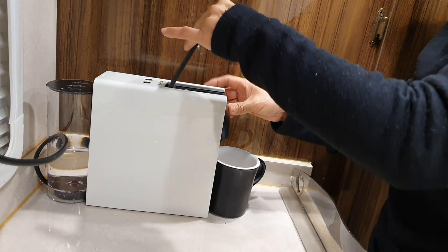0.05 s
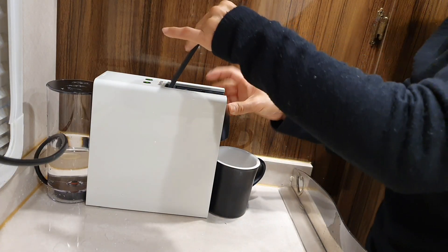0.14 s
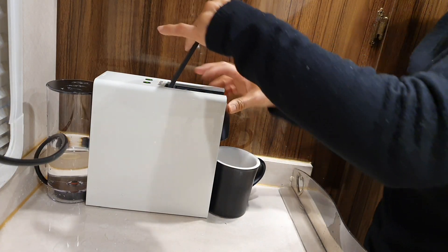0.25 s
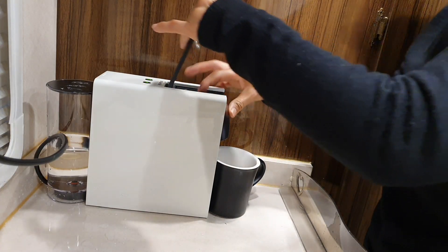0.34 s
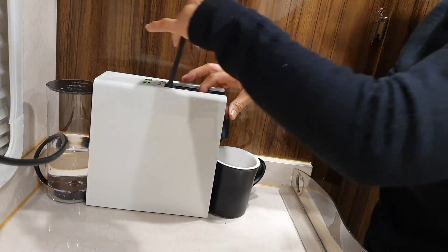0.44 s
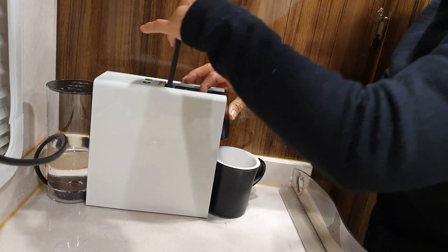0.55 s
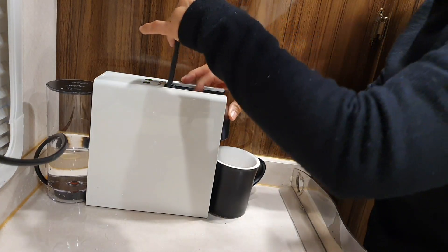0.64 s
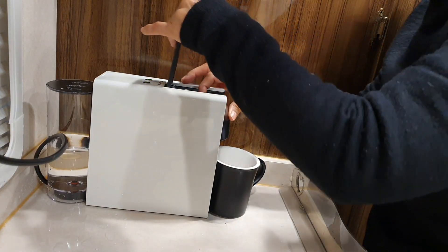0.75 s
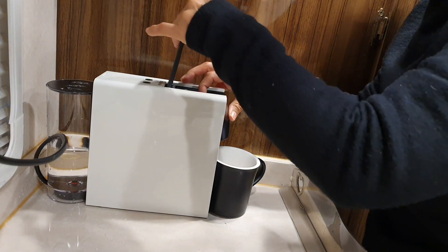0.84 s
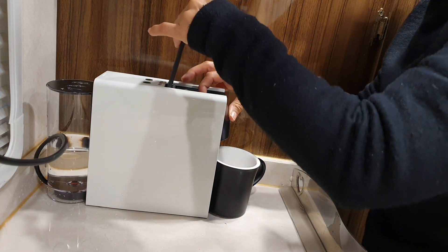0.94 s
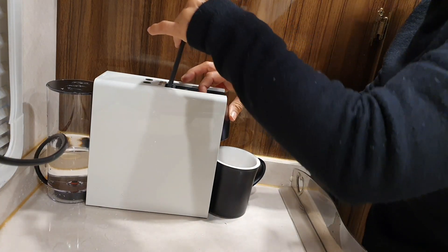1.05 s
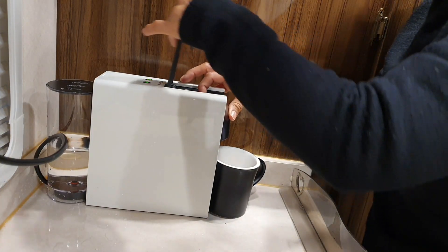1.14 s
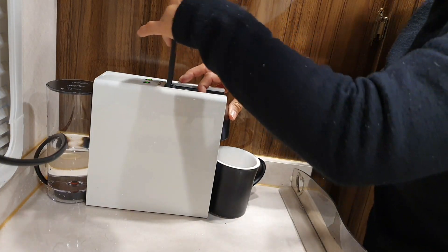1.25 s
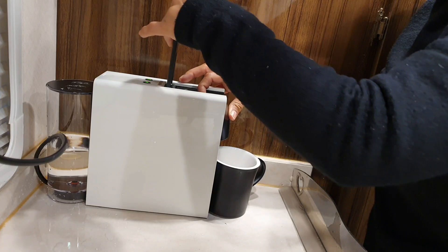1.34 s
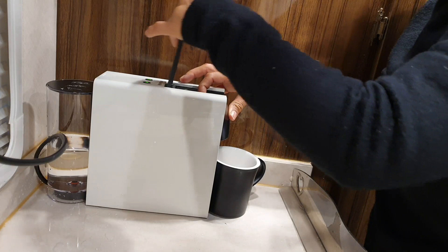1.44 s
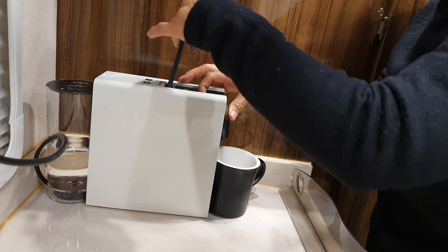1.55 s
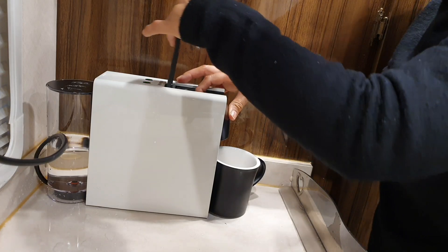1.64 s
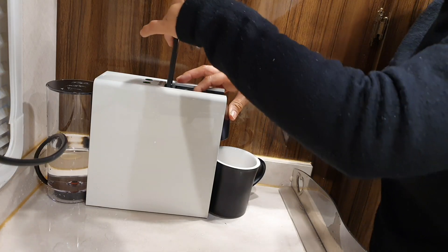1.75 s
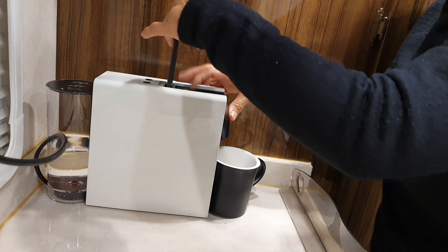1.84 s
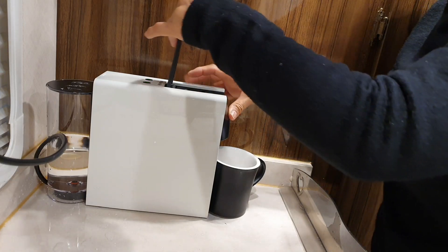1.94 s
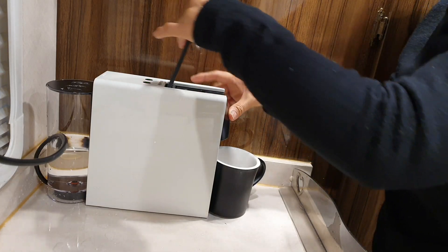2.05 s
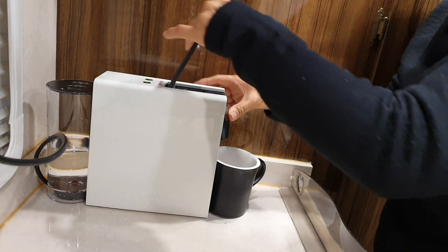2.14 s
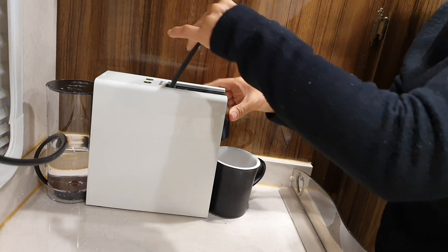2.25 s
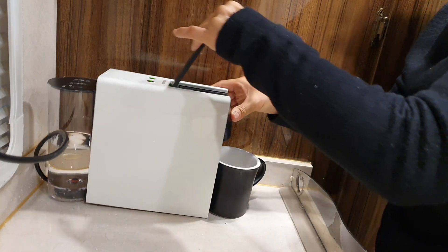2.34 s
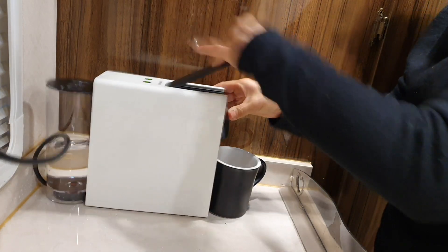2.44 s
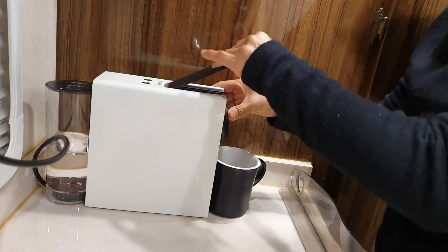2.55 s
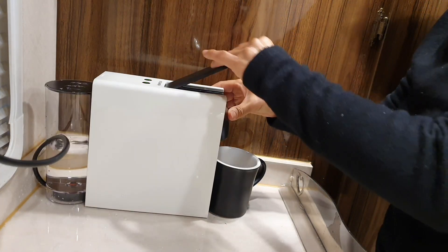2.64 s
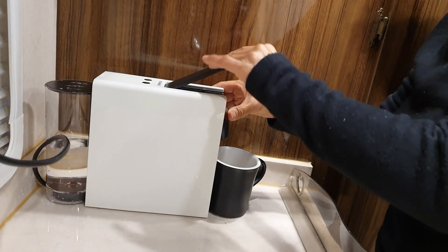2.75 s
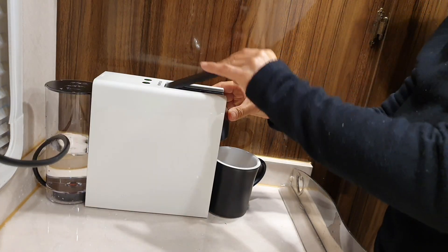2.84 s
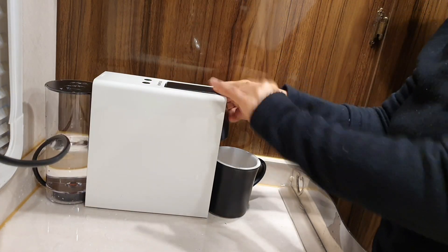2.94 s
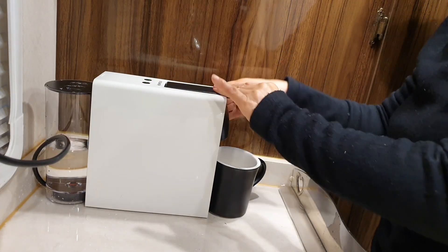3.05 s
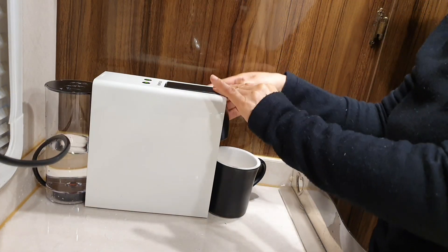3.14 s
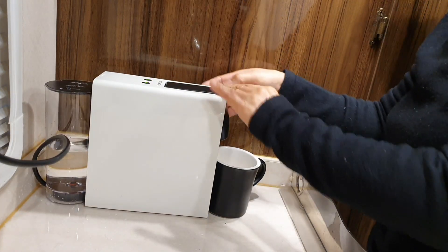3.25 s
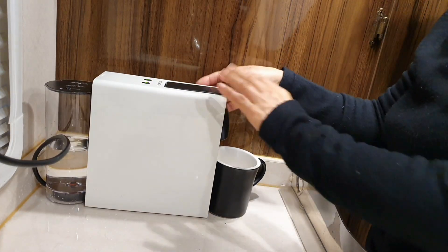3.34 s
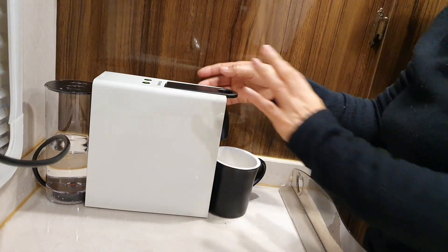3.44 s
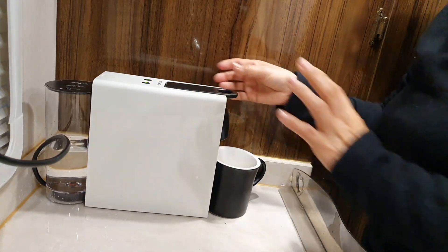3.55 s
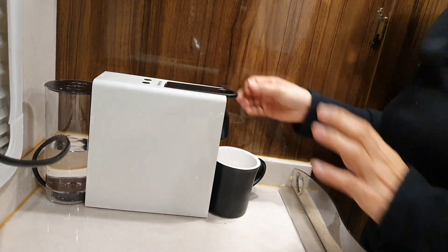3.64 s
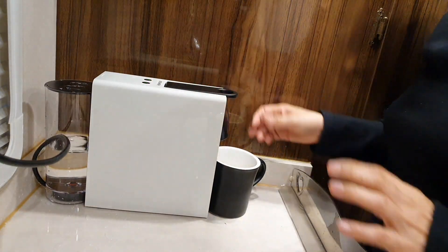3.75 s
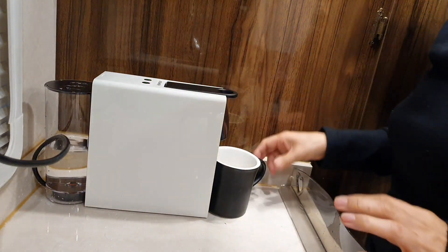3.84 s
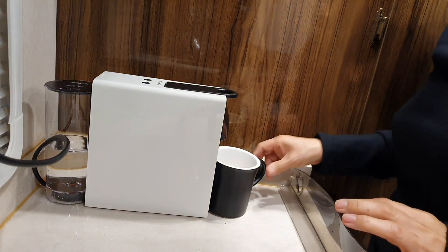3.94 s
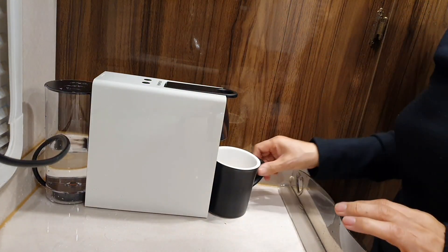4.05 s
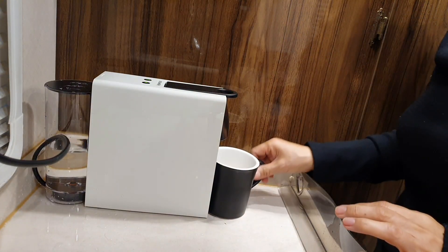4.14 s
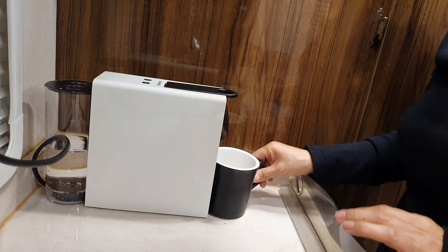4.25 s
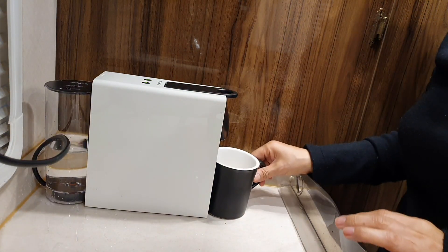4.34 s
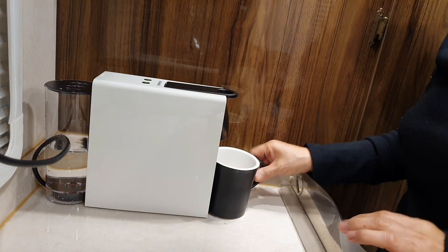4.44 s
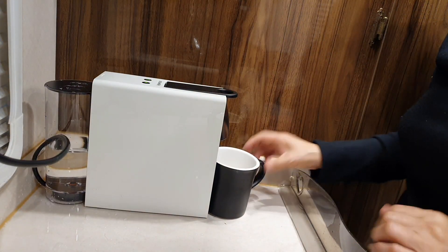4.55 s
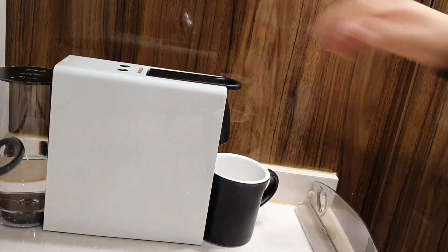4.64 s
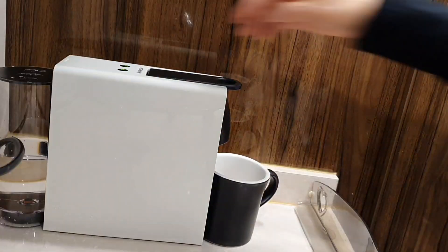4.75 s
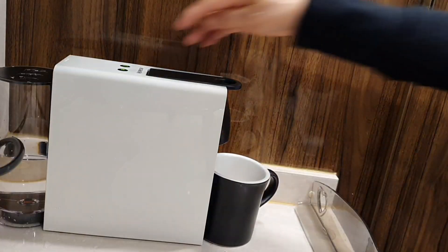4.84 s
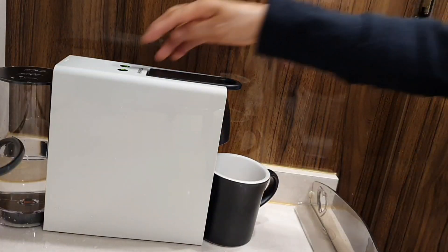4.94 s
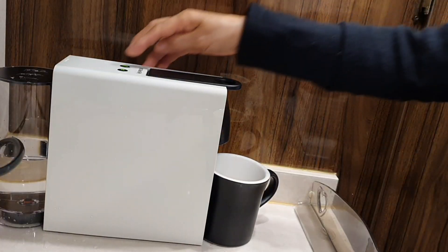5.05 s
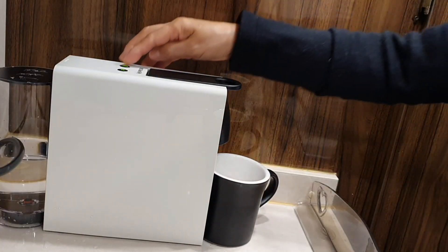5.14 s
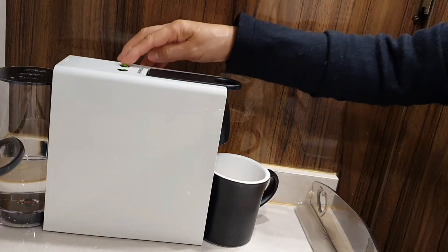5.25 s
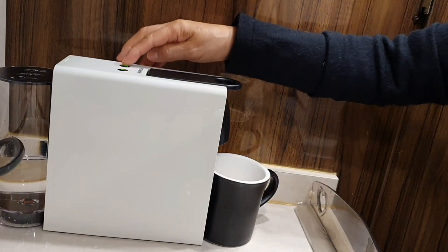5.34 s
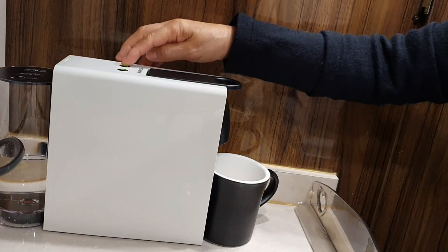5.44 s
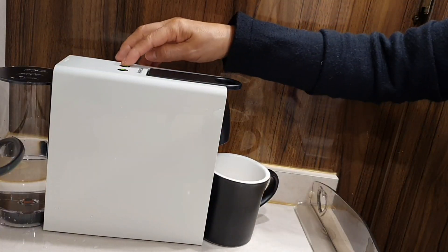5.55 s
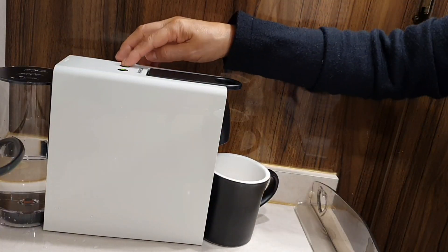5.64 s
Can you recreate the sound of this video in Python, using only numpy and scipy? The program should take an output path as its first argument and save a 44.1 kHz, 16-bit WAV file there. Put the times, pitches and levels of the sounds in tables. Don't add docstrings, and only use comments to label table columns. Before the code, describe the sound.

A small, hard-walled kitchen heard closely in stereo, with a low compressor hum around 120 Hz, airy casing noise and a thin wavering whine. From about 0.4 to 2.3 seconds a plastic lever is rocked: dull hollow knocks, light bright capsule ticks, a faint dry squeak near 0.6, and slight cloth rustle. A small crisp snap comes at 2.4. At 2.55 to 2.75 the lever goes down with a loud, dense, crackling crunch, bassy with sharp metallic-plastic edges. It slams shut at 3.07, a hard thud with a quick rebound and short ring. The hum and rumble duck afterwards, then recover. Around 4.27 a mug makes a quick double clink and bounces, followed by a dull knock at 4.34. At 4.7 the hum cuts off with a tiny tick. Until about 5.7 there is only quiet hiss, a soft low thump near 4.8, faint touches and a brief grainy finger brush at 5.3.

```python
import sys
import numpy as np
from scipy import signal
from scipy.io import wavfile

SR = 44100
rng = np.random.default_rng(int(sys.argv[2]) if len(sys.argv) > 2 else 0)


def wav_out(sig):
    wavfile.write(sys.argv[1], SR, np.round(np.clip(np.atleast_2d(sig).T, -1, 1) * 32767).astype(np.int16))


def nominal_scale(level):
    x = np.asarray(level, float) / 20
    return 10 ** x


N = 250469
T = np.arange(N) / SR
CUT_S = 4.692
EDGES_HZ = 25 * 2 ** np.arange(0, 9.7, .4)
CENTRES_HZ = np.sqrt(EDGES_HZ[1:] * EDGES_HZ[:-1])
LEVER_LAG, COUNTER_LAG = -5, 10

# freq_hz, level_db, t60_s
HOUSING_MODES = [(95, -10.5, 0.17), (142, -9.5, 0.23), (229, -8, 0.26), (275, -1, 0.16), (376, -13, 0.034),
                 (499, -5, 0.12), (545, -6, 0.34), (607.7, -9.5, 0.26), (876, -11.5, 0.084),
                 (1089, -11.5, 0.103), (1366, -16, 0.16), (1410, -19, 0.11), (2400, -9.5, 0.032),
                 (4700, -18, 0.023)]
# freq_hz, level_db, t60_s
COUNTER_MODES = [(152, -2, 0.065), (275, 8, 0.068), (347, -25, 0.21), (517, -1.5, 0.14), (607, 3, 0.078),
                 (810, -12, 0.064), (1350, -25, 0.049)]
# start_s, gain_db
AUTO_GAIN = [(0, 0.5), (1.3, 0.5), (2.2, 1.6), (2.6, 0), (2.8, -2.5), (3.3, -5.5), (3.9, -7.5),
             (4.25, -7.5), (4.45, -3.5), (4.68, -2)]


def rms_one(x):
    return x / np.sqrt(np.mean(x ** 2) + 1e-20)


def in_time(rows):
    s, *columns = np.transpose(rows)
    return [np.interp(T, s, c) for c in columns]


def at_hz(points, hz):
    points_hz, values = np.array(points).T
    return np.interp(np.log(hz), np.log(points_hz), values)


def sides(hz):
    # freq_hz, left_minus_right_db
    left_louder = [(60, 1.5), (180, 5), (550, 1.5), (1650, 5), (4970, 3), (9000, 5.5), (15000, 5.5)]
    return nominal_scale(at_hz(left_louder, hz) * np.array([[.5], [-.5]]))


def placed(x, left_db, lag):
    return np.array([np.roll(x[0], lag), x[1]]) * nominal_scale(left_db * np.array([[.5], [-.5]]))


def drift(rate_hz):
    r = np.exp(-80 * np.pi * rate_hz / SR)
    slow = signal.lfilter([1], [1, -2 * r, r * r], rng.standard_normal(N // 40 + 2002))[2000:]
    return np.interp(np.arange(N) / 40, np.arange(len(slow)), rms_one(slow))


def ring(x, hz, t60_s):
    r, w = nominal_scale(-60 / (t60_s * SR)), 2 * np.pi * hz / SR
    return signal.lfilter([0, np.sin(w)], [1, -2 * r * np.cos(w), r * r], x + 1e-18)


def stroke_db(s, hold_s, db, release, attack):
    return db - attack * np.clip(s - T, 0, None) - release * np.clip(T - s - hold_s, 0, None)


def stereo_bands():
    # freq_hz, left_right_likeness
    likeness = [(60, .97), (180, .9), (550, .55), (1650, .2), (5000, -.05), (15000, -.1)]
    white, bands = rng.standard_normal((2, 2, N)), []
    for k, hz in enumerate(CENTRES_HZ):
        sos = signal.butter(2, EDGES_HZ[k:k + 2], "band", fs=SR, output="sos")
        mid, side = signal.sosfilt(sos, white[k % 2])
        alike = np.clip(at_hz(likeness, hz), -.99, .99)
        bands.append(sides(hz) * (np.sqrt(1 + alike) * mid + np.sqrt(1 - alike) * side * [[1], [-1]]))
    return np.array(bands)


def coloured(bands, spectrum, shift_s):
    mix = np.tensordot(nominal_scale(at_hz(spectrum, CENTRES_HZ)), bands, 1)
    return np.roll(rms_one(mix), round(shift_s * SR), axis=1)


def contacts(blows, length_s, upper_db, stiffens=0, follows=0):
    return [(s, db, thud, crack, length_s * nominal_scale(-stiffens * (db + 20)), upper_db + follows * (crack + 25))
            for s, db, thud, crack in blows]


def blow_colour_db(blows, hz):
    s, peak_db, thud_db, crack_db = np.transpose(blows)[:4]
    low = np.clip(np.log(400 / hz) / 1.0, 0, 1)
    high = np.clip(np.log(hz / 1700) / 2.2, 0, 1)
    return peak_db + low * (thud_db - 1.0) + high * (crack_db + 18.5)


def struck(blows, modes, bands, ring_db, scatter_db, tail):
    # freq_hz, level_db_per_hz
    scatter = [(40, -43.5), (90, -7.5), (300, -9.5), (600, -14), (1300, -23), (2800, -27.5), (5000, -32),
               (7600, -45.5), (10000, -31), (15000, -34), (16800, -58.5)]
    # freq_hz, t60_s
    walls = [(60, 0.32), (150, 0.2), (500, 0.12), (1500, 0.14), (5000, 0.16), (14000, 0.1)]
    s, length_s, upper_db = np.array(blows)[:, [0, 4, 5]].T
    chatter = np.sort(rng.random((len(blows), 4)), axis=1)
    chatter = (chatter - chatter[:, :1]) * np.clip(length_s, .001, .03)[:, None]
    first, last = round((s[0] - .01) * SR), min(N, round((s[-1] + .45) * SR))
    at = np.round((s[:, None] + chatter) * SR).astype(int) - first
    out = np.zeros((2, last - first))

    for k, (hz, mode_db, t60_s) in enumerate(modes):
        clicks = np.zeros_like(out)
        level_db = blow_colour_db(blows, min(hz, 1700)) + mode_db + ring_db + upper_db * (hz > 1900)
        strength = nominal_scale(level_db[:, None] + rng.normal(0, 2.5, at.shape)) * [1, .5, .35, .2]
        strength = (-1) ** k * strength
        lag = round(min(hz / 900, 1) * rng.uniform(-.3, .3) * SR / hz)
        np.add.at(clicks[0], at, strength)
        np.add.at(clicks[1], at + lag, strength)
        out += ring(clicks, hz, t60_s) * sides(hz)

    for band, hz in zip(bands, CENTRES_HZ):
        power = np.zeros(last - first)
        level_db = blow_colour_db(blows, hz) + at_hz(scatter, hz) + scatter_db
        np.add.at(power, at, nominal_scale(2 * level_db)[:, None] * np.ones(at.shape))
        fall = nominal_scale(-120 / (tail * at_hz(walls, hz) * SR))
        rise = np.exp(-hz / (1.5 * SR) - 1 / (0.0034 * SR))
        crack = signal.lfilter([2.2 * min(hz / 4000, 1)], [1, -nominal_scale(-120 / (0.011 * SR))], power + 1e-24)
        echo = signal.lfilter([1 - rise], np.convolve([1, -fall], [1, -rise]), power + 1e-24)
        out += band[:, first:last] * np.sqrt(crack + echo)
    return np.pad(out, ((0, 0), (first, N - last)))


def lever_crunch(bands):
    # start_s, peak_db, thud_db, crack_db
    crunches = [(2.535, -35, -2, -43), (2.549, -29.5, -3, -28), (2.560, -24, -9.5, -21),
                (2.566, -13, -3.5, -28), (2.572, -14, -6, -27), (2.577, -11, -5.5, -19.5),
                (2.5955, -10, -8, -13), (2.602, -8, -2.5, -11.5), (2.609, -16.5, -7, -12.5),
                (2.620, -12.5, -6, -23), (2.627, -14.5, -7, -19.5), (2.635, -18.5, 0.5, -22),
                (2.652, -17.5, -12.5, -25), (2.677, -21, -7, 1), (2.681, -19, -18, -13.5),
                (2.698, -25.5, -1.5, -3.5), (2.719, -27.5, -1.5, -12), (2.739, -41, -4, -37),
                (2.798, -48.5, -8, -18.5)]
    # freq_hz, level_db, t60_s
    linkage = [(62, -5.5, 0.16), (121.1, 1.5, 0.14), (158.5, -9, 0.12), (275, -5.5, 0.065),
               (349, -3.5, 0.071), (572, -4, 0.12), (764, -29.5, .02), (1070, -13, 0.051),
               (1290, -8, 0.067), (2106, -7, 0.021), (4160, -23, 0.027)]
    blows = contacts(crunches, 0.0041, -4.5, stiffens=.3, follows=0.43)
    return placed(struck(blows, linkage, bands, ring_db=-9.5, scatter_db=9.0, tail=0.88), .1, LEVER_LAG)


def lever_slam(bands):
    # start_s, peak_db, thud_db, crack_db
    slams = [
        (3.0705, -24.5, -14.5, -32),
        (3.0722, -7, -14, -21),
        (3.083, -9.5, -6.5, -31.5),
        (3.338, -48, 9, -55),
        (3.38, -55.5, 12, -35),
    ]
    # freq_hz, level_db, t60_s
    shell = [(91.7, -22.5, 0.51), (129.8, -13.5, 0.1), (148.7, -6, 0.18), (356, -13.5, 0.05),
             (443.4, -13, 0.13), (552, -14, 0.18), (624.6, -14.5, 0.11), (797, -17, 0.057),
             (1066, -22, 0.056), (1217, -25.5, 0.13), (1305, -22, 0.1354), (1616, -24, 0.15),
             (2385, -32.5, 0.12), (4918, -19.5, 0.034)]
    blows = contacts(slams, 0.0034, 2.0, stiffens=0.55, follows=0.9)
    return placed(struck(blows, shell, bands, ring_db=-8.0, scatter_db=7.0, tail=1.0), 0.2, 0)


def lever_rocking(bands):
    # start_s, peak_db, thud_db, crack_db
    rocks = [(0.421, -35.5, -4, -56), (0.447, -39, -11, -25), (0.461, -27.5, -10, -50),
             (0.489, -46, 3, -26), (0.554, -45, 6, -26), (0.902, -38, 2, -53), (0.930, -29.5, -36, -51),
             (1.283, -23, -10.5, -48), (1.58, -38.5, 16.5, -50), (1.598, -25, -34, -33.5),
             (1.616, -37, 15.5, -39), (1.741, -32, -11, -44), (2.113, -31.5, 0.5, -54),
             (2.156, -33.5, 6, -45), (2.185, -31.5, -4, -47), (2.209, -27, -8, -47)]
    # start_s, peak_db, thud_db, crack_db
    ticks = [(0.529, -45, 12.5, -30), (0.592, -46.5, -11, -30), (0.614, -53, -17, -21),
             (0.694, -44, -4, -29), (0.716, -50, -16, -18), (0.939, -38.5, 14.5, -31),
             (0.963, -47, -19, -28), (1.184, -45, 7, -50), (1.31, -35.5, 8.5, -26), (1.34, -42, 4.5, -33),
             (1.606, -31.5, 4, -30), (1.709, -44, -28, -33), (1.732, -43.5, 14.5, -32),
             (1.791, -33.5, 0.5, -33), (1.82, -52, 3, -21), (2.239, -44, -62, -21),
             (2.26, -40.5, 1.5, -27.5), (2.491, -50, -10, -25)]
    blows = sorted(contacts(rocks, .012, -16) + contacts(ticks, 0.013, 9.9, follows=0.56))
    return placed(struck(blows, HOUSING_MODES, bands, ring_db=-9.0, scatter_db=8.0, tail=0.94), 0.1, LEVER_LAG)


def capsule_snap(bands):
    # start_s, peak_db, thud_db, crack_db
    snaps = [
        (2.3855, -31, -23.5, -22),
    ]
    # freq_hz, level_db, t60_s
    seat = [(513, -7, 0.16), (889, -9.5, 0.1), (1143, 4, 0.042), (1604, 4, 0.051), (2810, -15, 0.035),
            (3240, -8, 0.051)]
    blows = contacts(snaps, 0.0016, 1.5)
    return placed(struck(blows, seat, bands, ring_db=-7, scatter_db=11.5, tail=0.83), 0.1, LEVER_LAG)


def mug_nudge(bands):
    # start_s, peak_db, thud_db, crack_db
    clinks = [
        (4.265, -22, -7, -23),
        (4.2685, -26.5, -12, -23.5),
        (4.278, -21, -1, -28),
        (4.2845, -22, -24, -22),
        (4.291, -25, -7, -46),
    ]
    # freq_hz, level_db, t60_s
    tray = [(564, -11, 0.15), (793, -5, 0.072), (1267, -1, 0.066), (1522, -3, 0.041), (2360, -10, 0.061),
            (2740, -1.5, 0.015), (3860, -20, 0.05), (4240, -15.5, 0.033), (5320, -14.5, 0.023),
            (9440, -33, .03)]
    # start_s, peak_db, thud_db, crack_db
    knocks = [
        (4.343, -38, 5.5, -66),
        (4.424, -51.5, 14, -40),
        (4.454, -58, 15, -38),
        (4.548, -54, -9, -50.5),
    ]
    mug = struck(contacts(clinks, 0.00379, 1.5), tray, bands, ring_db=-9.5, scatter_db=8.5, tail=0.8)
    knock = struck(contacts(knocks, 0.0069, -10), COUNTER_MODES, bands, ring_db=-2, scatter_db=7.5, tail=0.92)
    return placed(mug + knock, 0.11, 0)


def hand_touches(bands):
    # start_s, peak_db
    touches = [(4.8, -62), (4.873, -62), (4.904, -60.5), (5.086, -58.5), (5.148, -66), (5.387, -52),
               (5.415, -56.5), (5.439, -64), (5.631, -69.5)]
    thud_db, crack_db = -5.5, -43
    blows = contacts([(s, db, thud_db, crack_db) for s, db in touches], 0.013, -15)
    return placed(struck(blows, COUNTER_MODES, bands, ring_db=-14.5, scatter_db=8.5, tail=1.0), 0.1, COUNTER_LAG)


def finger_brush(bands):
    # freq_hz, level_db_per_hz
    skin = [(290, -12), (500, -6.5), (1840, -7), (2040, -2), (4420, -17.5), (5500, -13.5), (7500, -18),
            (10000, -5), (13100, -5.5), (15800, -7), (16500, -27.5)]
    level_db = stroke_db(5.296, hold_s=0.0249, db=-52.5, release=391, attack=1100)
    return placed(coloured(bands, skin, shift_s=3.5) * nominal_scale(level_db + 1.9 * drift(67)), 0.1, COUNTER_LAG)


def pings():
    # start_s, peak_db, freq_hz, t60_s
    parts = [(.448, -51.5, 10440, .09), (.598, -70, 5500, .08), (.72, -70, 5400, .03),
             (.936, -50, 4750, .055), (.94, -56, 2400, .04), (1.311, -58, 5200, .04),
             (1.608, -40, 4710, .047), (1.794, -51, 2450, .03), (1.797, -46, 4720, .03),
             (2.598, -24, 4160, .05), (2.606, -26, 4990, .05), (2.6785, -19, 2812, .06),
             (2.679, -27, 3531, .06), (2.6795, -24, 4850, .05), (2.68, -23, 5879, .03),
             (2.684, -28, 6476, .05), (2.692, -29, 5000, .04), (3.071, -56, 2720, .8),
             (4.266, -32, 2760, .04), (4.267, -32, 1290, .06), (4.28, -66, 10228, .28),
             (4.281, -73, 8540, .25), (4.338, -75, 8500, .14), (4.34, -84, 12400, .1),
             (4.44, -88, 14200, .25), (4.445, -82, 8446, .28), (4.797, -80, 8700, .06),
             (4.798, -82, 6300, .08)]
    twin_ratio, twin_db = 1.012, -8
    swell = 1 - np.exp(-T[:SR // 2] / 0.0026)
    out = np.zeros((2, N))
    for s, peak_db, hz, t60_s in parts:
        at = round(s * SR)
        click = np.zeros(SR // 2)
        click[0] = nominal_scale(peak_db)
        tone = ring(click, hz, t60_s) + nominal_scale(twin_db) * ring(click, twin_ratio * hz, t60_s)
        out[:, at:at + SR // 2] += tone * swell * sides(hz) * [[1], [.6]]
    return out


def lever_drag():
    # start_s, hold_s, level_db, release_db_per_s
    housing_drags = [
        (.48, 0.14, -50, 390),
        (3.14, 0.084, -51, 87.5),
    ]
    # start_s, hold_s, level_db, release_db_per_s
    squeaks = [
        (.48, .09, -96, 300),
        (.61, .04, -73, 600),
    ]
    attack_db_per_s, end = 451.5, round(3.8 * SR)
    housing_db, squeak_db = (np.max([stroke_db(*row, attack_db_per_s) for row in rows], axis=0)[:end]
                             for rows in (housing_drags, squeaks))
    friction = rng.standard_normal((2, N)) * nominal_scale(2.0 * drift(45))
    friction[1] = 0.29 * friction[0] + 0.96 * friction[1]
    friction = friction[:, :end]
    body = sum(ring(friction, hz, .6 * t60_s) * nominal_scale(db) for hz, db, t60_s in HOUSING_MODES[2:9])
    squeak = ring(friction, 4800, 0.0025)
    out = rms_one(body) * nominal_scale(housing_db) + rms_one(squeak) * nominal_scale(squeak_db)
    return np.pad(out, ((0, 0), (0, N - end)))


def thumps():
    # start_s, peak_db, freq_hz, t60_s
    pushes = [(.905, -49, 600, .1), (.934, -32.5, 534, 0.077), (.957, -42, 545, 0.05),
              (1.596, -41, 110, .1), (2.186, -29, 545, 0.1), (2.212, -34, 545, 0.027),
              (2.261, -32, 121, .1), (2.569, -18, 561, .05), (2.5966, -9, 189, 0.027),
              (2.600, -17.5, 62, 0.22), (2.603, -28, 167, 0.023), (2.6186, -18, 135, 0.058),
              (2.642, -11, 113.6, .06), (2.655, -17, 573, 0.067), (2.6814, -12.5, 362, 0.023),
              (2.703, -25.5, 275, 0.19), (3.0727, -8, 272, 0.18), (3.0734, -22, 156, 0.13),
              (3.073, -10.5, 187.2, 0.093), (3.17, -48, 625, 0.46), (3.26, -53.5, 365.6, 0.32),
              (4.342, -28, 275, .14), (4.828, -32, 79.7, 0.079), (5.352, -43.5, 73, .11)]
    out = np.zeros((2, N))
    for s, peak_db, hz, t60_s in pushes:
        at = slice(round((s - .02) * SR), round((s + .3) * SR))
        push = np.exp(-.5 * ((T[at] - s) * hz / 0.17) ** 2)
        thump = ring(np.gradient(push), hz, t60_s)
        out[:, at] -= nominal_scale(peak_db) * thump / np.abs(thump).max() * sides(hz)
    return out


def compressor(bands):
    # freq_hz, width_hz, level_db
    resonances = [
        (282, 31, -4),
        (600, 63, 1),
        (1200.5, 98, -11),
    ]
    # freq_hz, level_db_per_hz
    airflow = [(88, -24.5), (150, -8), (183, -21), (282, -9.5), (500, -17.5), (602, -14.5), (779, -24),
               (849, -22), (965, -23.5), (1350, -29), (1640, -45.5), (3000, -40), (3900, -62), (5980, -95),
               (10100, -120)]
    # freq_hz, peak_db
    whine = [(274.5, -75), (339.1, -72.5), (484.5, -85), (608.3, -86), (850.6, -80), (1044, -88),
             (1211, -90.5), (1308, -81.5), (2261, -86), (2487, -89.5), (2697, -84), (2955, -85.5),
             (3171, -83), (3295, -92.5), (3408, -80.5)]
    gain_db, = in_time(AUTO_GAIN)
    hum_db, whine_db = -49 + gain_db, -68 + gain_db

    hum_hz, wobble_db, wander_hz = 121.6, 2.2, .4
    turns_s = np.cumsum(1 + wander_hz / hum_hz * drift(5.4)) / SR
    hum = np.sqrt(2) * np.sin(2 * np.pi * hum_hz * turns_s) * nominal_scale(hum_db + wobble_db * drift(3.9)) * sides(hum_hz)

    settle_share, settle_s, settle_db = .032, .45, 4.5
    settling = np.exp(-T / settle_s)
    ahead_s, louder = settle_share * settle_s * (1 - settling), nominal_scale(settle_db * settling)
    flicker = [nominal_scale(1.6 * drift(25)) for _ in range(5)]
    lead = rng.random((len(whine), 1, 1)) + rng.normal(0, .1, (len(whine), 2, 1))
    partials = 0
    for k, (hz, db) in enumerate(whine):
        mesh, upper = int(2000 < hz < 3100), int(hz > 3100)
        phase_s = T + 0.52 * (turns_s - T) + (mesh + .45 * upper) * ahead_s
        level = nominal_scale(db) * flicker[k % 5] * louder ** (mesh - upper)
        partials = partials + level * np.sin(2 * np.pi * (hz * phase_s + lead[k]))

    white = rng.standard_normal((2, N))
    grille_band = signal.cheby1(6, 1, [2050, 3680], "band", fs=SR, output="sos")
    grille = rms_one(signal.sosfilt(grille_band, white))
    casing = sum(nominal_scale(db) * rms_one(ring(white, hz, 3.9 / width_hz)) for hz, width_hz, db in resonances)
    flow_lowpass = signal.cheby2(8, 30, 3800, fs=SR, output="sos")
    flow = signal.sosfilt(flow_lowpass, coloured(bands, airflow, shift_s=1))
    air = flow * nominal_scale(6.5) + casing * nominal_scale(6.0) + partials * nominal_scale(76.0) + grille * nominal_scale(-3.5)
    tick = nominal_scale(-41) * np.exp(600 * np.minimum(T - CUT_S, 0))
    return (hum + air * nominal_scale(whine_db + 0.94 * drift(6.9)) + tick) * (T < CUT_S)


def room_and_clothes(bands):
    # freq_hz, level_db_per_hz
    rumble_colour = [(18, -34.5), (30, -11.5), (55, -5), (75, -7), (100, -23), (150, -39.5), (270, -30.5),
                     (400, -39.5), (800, -52), (1500, -62.5), (2500, -100)]
    # freq_hz, level_db_per_hz
    rustle_colour = [(2650, -41.5), (4500, -3.5), (7140, -16.5), (11000, 0), (15500, -8.5), (16500, -19)]
    # start_s, length_s, rumble_db, rustle_db
    moves = [(0.24, 0.18, -56, -88), (0.61, 0.19, -51, -77), (1.155, 0.21, -53, -83),
             (1.72, 0.3, -56, -82.5), (2.367, 0.22, -49, -81), (2.744, 0.071, -36.5, -86),
             (3.127, 0.091, -40, -76), (4.276, 0.071, -58.5, -78.5), (4.872, 0.14, -52.5, -79),
             (5.1, 0.099, -55.5, -80.5), (5.368, 0.068, -55.5, -100), (5.604, 0.073, -65, -90)]
    gain_db = in_time(AUTO_GAIN)[0] * (T < CUT_S)
    swells = np.array([np.exp(-((T - s) / length_s) ** 2) for s, length_s, _, _ in moves])
    rocking, rubbing = np.sqrt(nominal_scale(2 * np.array(moves)[:, 2:]).T @ swells)
    rumble = np.hypot(nominal_scale(-61 + gain_db), rocking) * nominal_scale(0.57 * drift(4.4))
    rustle = np.hypot(nominal_scale(-88 + gain_db), rubbing) * nominal_scale(.7 * drift(15))
    return coloured(bands, rumble_colour, shift_s=1.1) * rumble + coloured(bands, rustle_colour, shift_s=9) * rustle


def microphone_hiss(bands):
    # freq_hz, level_db_per_hz
    hiss_colour = [(250, -25), (500, 0), (1000, -3), (2500, -5), (5500, -8), (7500, -12), (9500, -5),
                   (15100, -4), (16500, -11)]
    return coloured(bands, hiss_colour, shift_s=7.9) * nominal_scale(-83.5)


def scene():
    bands = stereo_bands()
    machine = lever_crunch(bands) + lever_slam(bands) + lever_rocking(bands) + capsule_snap(bands)
    counter = mug_nudge(bands) + hand_touches(bands) + finger_brush(bands)
    hands = machine + counter + pings() + lever_drag() + thumps()
    return hands + compressor(bands) + room_and_clothes(bands) + microphone_hiss(bands)


def top_cut(x):
    return signal.sosfilt(signal.butter(12, 16960, fs=SR, output="sos"), x)


def record(dry):
    heard = signal.sosfilt(signal.butter(2, 42, "high", fs=SR, output="sos"), dry)
    rounded = 1.2 * np.tanh(heard / 1.2)
    heard = signal.sosfilt(signal.cheby2(10, 50, 17000, fs=SR, output="sos"), rounded)
    return top_cut(heard)


dry = scene()
out = record(dry)
wav_out(out)
```